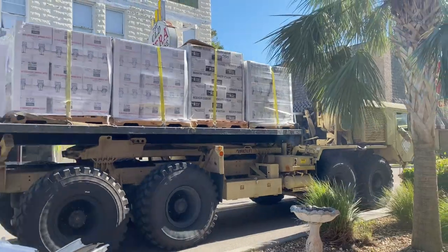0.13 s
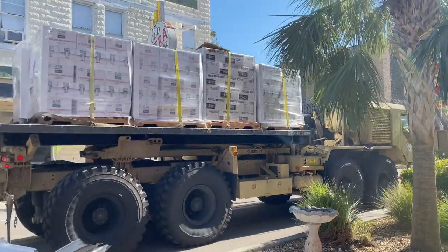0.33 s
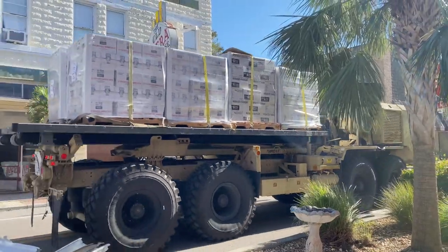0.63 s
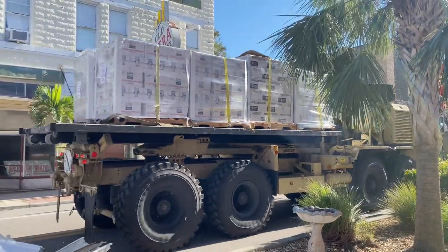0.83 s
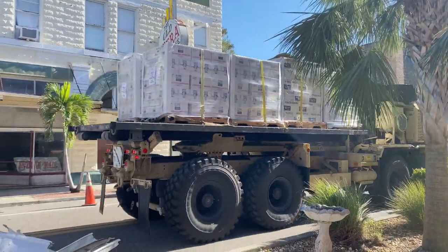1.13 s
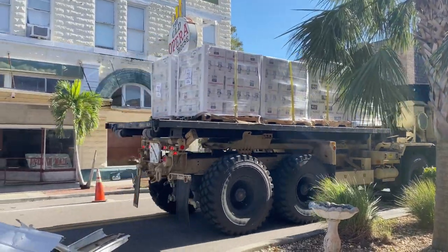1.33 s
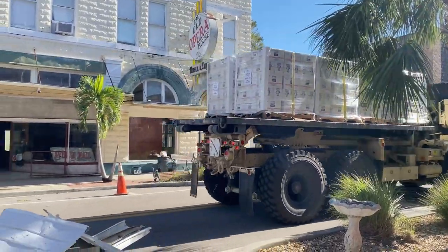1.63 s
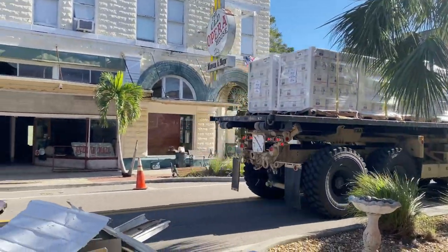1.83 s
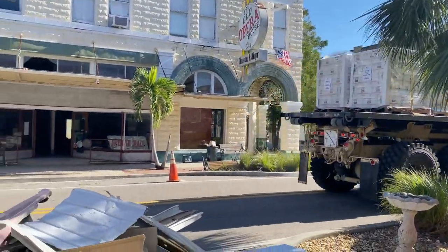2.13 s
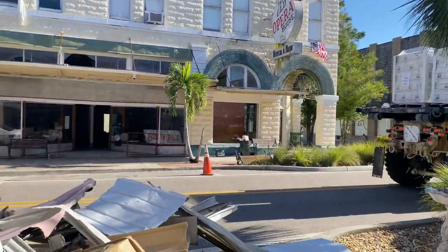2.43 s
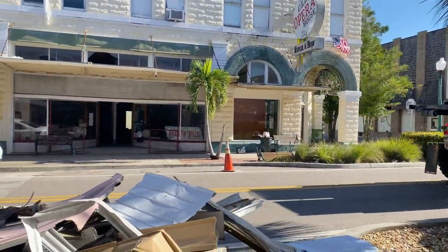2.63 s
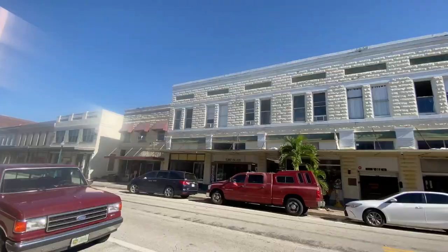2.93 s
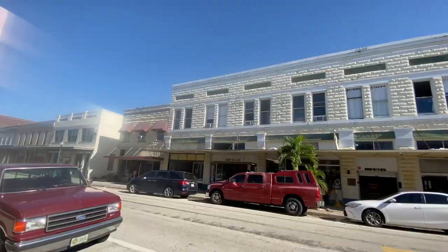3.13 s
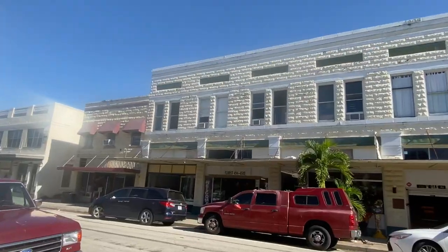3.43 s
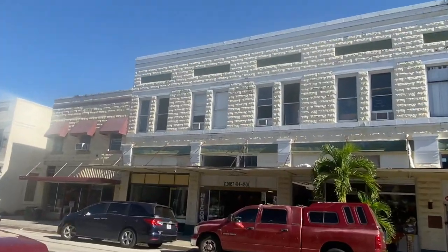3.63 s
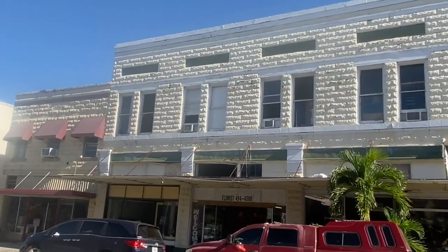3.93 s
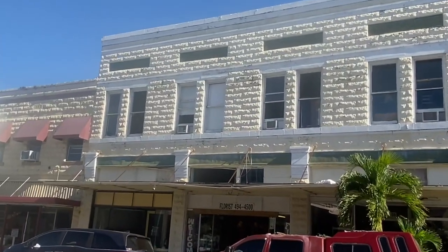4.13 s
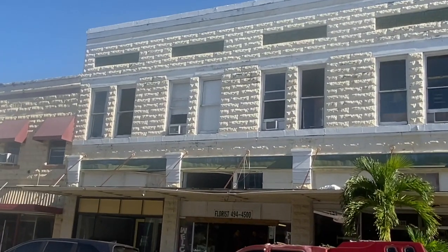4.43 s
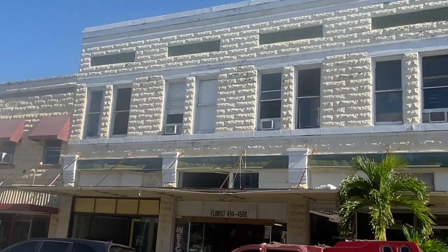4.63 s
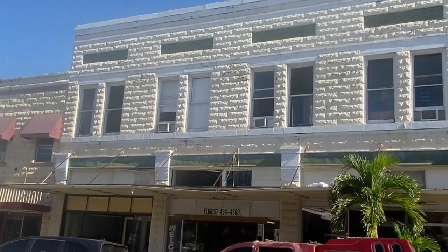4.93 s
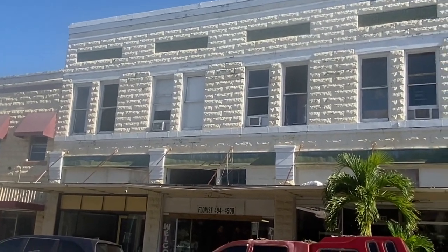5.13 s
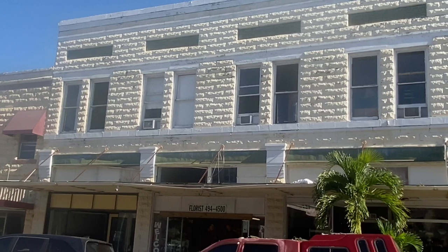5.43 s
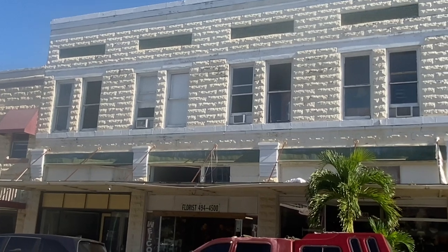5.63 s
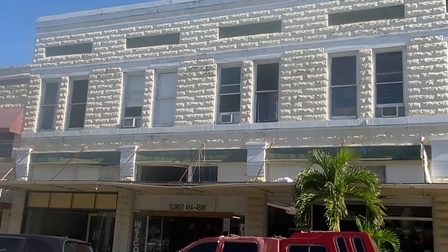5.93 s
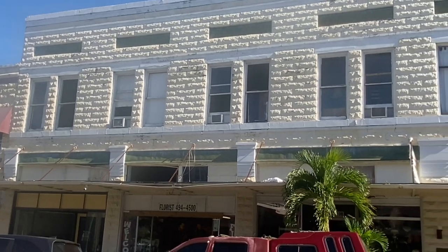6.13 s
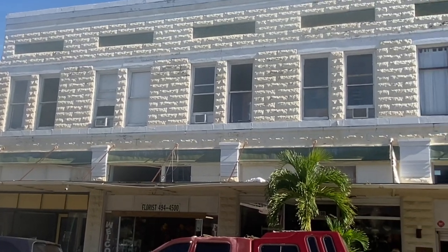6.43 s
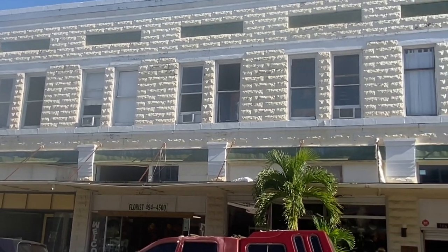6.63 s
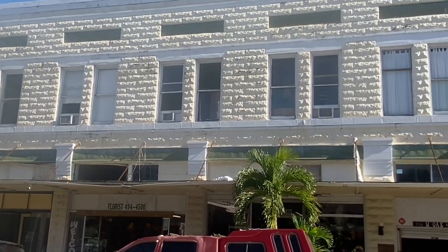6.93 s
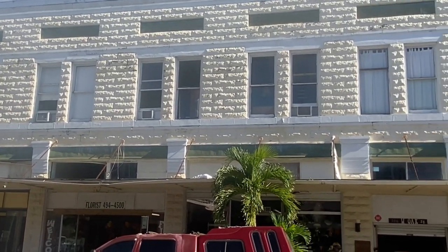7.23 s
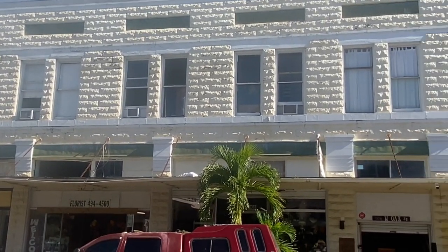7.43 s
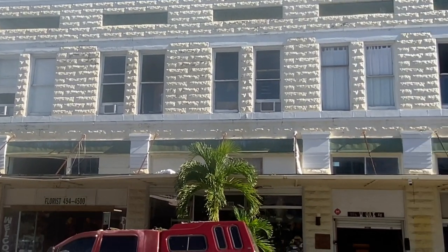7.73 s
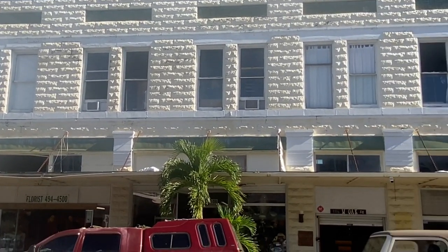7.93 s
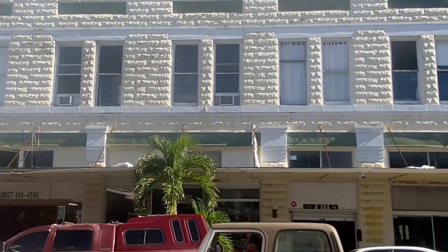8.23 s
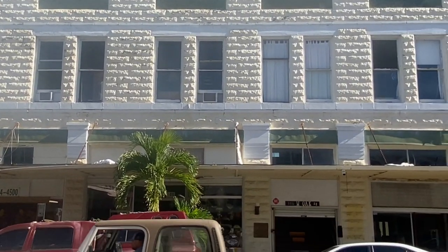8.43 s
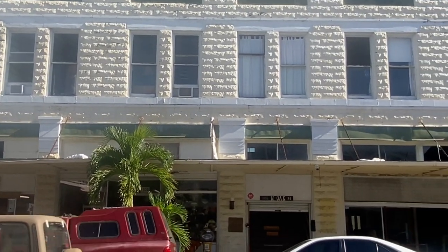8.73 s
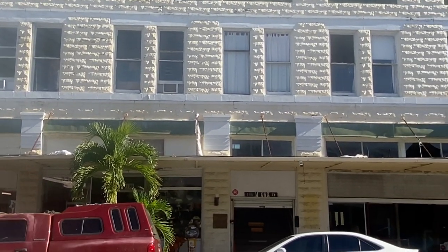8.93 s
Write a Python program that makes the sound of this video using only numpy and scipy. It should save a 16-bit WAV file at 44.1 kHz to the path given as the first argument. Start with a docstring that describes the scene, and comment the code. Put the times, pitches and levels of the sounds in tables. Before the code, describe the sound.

A big truck revs and whines past, giving way abruptly to a quieter street with buzzing cicadas and wind bumping the microphone.

```python
"""A heavy diesel truck pulls away close by along a shop street: a climbing firing drone, gear whine,
exhaust and tyre roar, turbo whistles and a puff of air from a valve.
A hard cut drops to the same street, now quiet. Cicadas throb in the trees, their clicks blurring to a
buzz in resonant abdomens; light wind bumps the microphone, distant engines hum and a car rolls
slowly past."""
import sys
import numpy as np
from scipy import signal
from scipy.fft import rfft, irfft
from scipy.io import wavfile
from scipy.ndimage import uniform_filter1d

SR = 44100
rng = np.random.default_rng(int(sys.argv[2]) if len(sys.argv) > 2 else 0)


def output_pcm(signal):
    """Save a mono or channel-first signal as 16-bit PCM at the path in sys.argv[1].

    Samples are clipped to [-1, 1] before scaling.
    """
    pcm = np.clip(np.atleast_2d(signal).T, -1, 1) * 32767
    wavfile.write(sys.argv[1], SR, np.round(pcm).astype(np.int16))


N = 400428
T = np.arange(N) / SR
CUT_S = 2.923
SIZE, HOP = 1024, 256
HZ, FRAME_S = np.fft.rfftfreq(SIZE, 1 / SR), np.arange(N // HOP + 5) * HOP / SR

# The engine revving up: time_s, firing_hz
FIRING = [(0, 31), (.18, 40.7), (.51, 56.4), (.69, 59.3), (1.15, 67.4), (1.93, 76.6), (2.68, 88.2),
          (2.93, 90)]
# Stereo image of the near and far sounds: freq_hz, likeness (0-1), right_lead_turns
NEAR_IMAGE = [(60, 0.96, .01), (170, 0.89, .03), (340, .7, .11), (600, .5, .23), (1200, 0.28, 0.34),
              (1800, 0.3, 0.56), (2590, 0.4, 0.8), (3800, 0.13, 1.03), (7000, 0.12, 1.16),
              (9100, 0.45, 1.44), (10040, .6, 1.74), (11000, 1, 2), (11750, 1, 1.97), (12700, .95, 2.5),
              (13700, .95, 2.5), (14800, 1, 3)]
FAR_IMAGE = [(60, .85, 0), (170, .8, .02), (340, 0.7, 0.14), (600, 0.52, 0.21), (1190, 0.48, 0.5),
             (1770, 0.46, 0.92), (2470, 1, 1), (7550, .99, 1), (8560, 0.9, 1.55), (9050, 1, 1.5),
             (10000, 0.9, 1.73), (10900, 1, 2), (11700, 1, 2), (12700, .95, 2.5), (13700, 1, 2.5),
             (14900, 1, 3)]


def amp(db):
    """Decibels to gain."""
    return 10 ** (np.asarray(db) / 20)


def unit_rms(x):
    """Scales to rms 1."""
    return x / np.sqrt(np.mean(x ** 2) + 1e-20)


def at_hz(table, hz, column=1):
    """Reads a table on a log-frequency axis."""
    columns = np.transpose(table)
    return np.interp(np.log(hz + 1), np.log(columns[0] + 1), columns[column])


def curves(table):
    """Joins timed rows by straight lines, one curve per value column."""
    time_s, *columns = np.transpose(table)
    return [np.interp(T, time_s, column) for column in columns]


def wander(rate_hz):
    """Smooth random drift of rms 1, rolling off above rate_hz."""
    step = 32
    size = N // step + 2
    rolloff = np.exp(-(np.fft.rfftfreq(size, step / SR) / rate_hz) ** 2)
    drift = irfft(rfft(rng.standard_normal(size)) * rolloff, size)
    return np.interp(np.arange(N) / step, np.arange(size), unit_rms(drift))


def noise(colour_db, image, patchy_db=1.5, patch_size=(10, 10)):
    """Coloured stereo noise of rms 1, mottled in level by patches of (bins, frames)."""
    a, b, c, d, patches = rng.standard_normal((len(FRAME_S), len(HZ), 5), dtype=np.float32).T
    for axis, size in enumerate(patch_size):
        patches = uniform_filter1d(patches, size=size, axis=axis)
    # the mid treble opens wide just after the cut, then gathers in the centre
    wide = np.outer((HZ > 1500) & (HZ < 8700), (FRAME_S > CUT_S) & (FRAME_S < 4.25))
    likeness = np.clip(at_hz(image, HZ)[:, None] * np.where(wide, .12, 1), 0, 1)
    delay = np.exp(-2j * np.pi * at_hz(image, HZ, column=2))[:, None]
    right = a + 1j * b
    left = likeness * delay * right + np.sqrt(1 - likeness ** 2) * (c + 1j * d)
    gain = amp(np.reshape(colour_db, (len(HZ), -1)) + patchy_db * unit_rms(patches))
    _, stereo = signal.istft(gain * np.array([left, right]), nperseg=SIZE, noverlap=SIZE - HOP)
    return unit_rms(stereo[:, :N])


def tone(hz, rms_db, waver_db=0., blur_hz=0.):
    """A sine following pitch and level curves, with optional slow waver and fast pitch jitter."""
    turns = np.cumsum(hz + blur_hz * wander(143)) / SR + rng.random()
    return np.sqrt(2) * amp(rms_db + waver_db * wander(3.6)) * np.sin(2 * np.pi * turns)


def glide(start_s, length_s, from_hz, to_hz, crest_db, **texture):
    """A sliding tone that swells to its midpoint and falls away."""
    progress = np.clip((T - start_s) / length_s, 0, 1)
    fade = np.clip(np.minimum(progress, 1 - progress) * length_s / .021, 0, 1)
    level_db = crest_db - 9.5 * (2 * progress - 1) ** 2
    return fade * tone(from_hz + (to_hz - from_hz) * progress, level_db, **texture)


def placed(x, left_db=0., lag_s=.0003):
    """Sets a mono source off to the right: the left microphone hears it later."""
    return np.array([amp(left_db / 2) * np.roll(x, round(lag_s * SR)), amp(-left_db / 2) * x])


def engine_drone():
    """Firing tones sweep through the pipe's resonances; six uneven cylinders add sixths between them."""
    # Strong partials: multiple of the firing rate; level_db at full throttle, ahead of the pipe
    multiples = np.array([2, 3, 4, 6, 8]) / 2
    levels_db = [-19.5, -32.5, -28, -38, -42.5]
    # Resonances of exhaust pipe and street together: freq_hz, gain_db
    pipe = [(40, 3), (59.5, 6.5), (65, -2), (70, 2.5), (74, -3), (77, 3.5), (82, -4.5), (86, -0.5),
            (91, -13), (104, 7.5), (113, -8), (130, 2.5), (142, 0.5), (147, -8), (154, 0), (165, -10),
            (176, -5.5), (250, 1.5), (350, 0)]
    firing_hz, = curves(FIRING)
    coasting_db, throttle_s, rise_s = -16, .59, .044  # weak until the driver steps on it
    load_db = coasting_db / (1 + np.exp((T - throttle_s) / rise_s))
    drone = sum(tone(k * firing_hz, db + load_db + at_hz(pipe, k * firing_hz))
                for k, db in zip(multiples, levels_db))
    sixths = [k / 6 for k in range(5, 40) if k / 6 not in multiples]
    drone += sum(tone(k * firing_hz, -45.5 - 3.3 * k, waver_db=7) for k in sixths)
    return placed(drone, left_db=1.2, lag_s=.00045)


def gear_whine():
    """Gear teeth sing with the revs, loudest as the gearbox goes by, among brief drivetrain moans."""
    # Drivetrain tones: start_s, length_s, from_hz, to_hz, crest_db
    moan_glides = [(.2, .45, 466, 470, -32), (.85, .25, 473, 474, -33), (2.08, .47, 378, 411, -28.5),
                   (2.5, .4, 266, 288, -31.5), (2.65, .35, 207, 224, -31.5), (.2, .35, 1380, 1450, -37),
                   (.53, .13, 1880, 1780, -36), (.7, .24, 1880, 1800, -38), (1.04, .14, 1760, 1790, -35),
                   (1.2, .19, 1830, 1840, -32)]
    firing_hz, = curves(FIRING)
    teeth_per_firing, loudest_s = 32.3, 1.5
    gear_db = -37.5 - 4 * (T - loudest_s) ** 2
    gear = tone(teeth_per_firing * firing_hz, gear_db, waver_db=2.5, blur_hz=38)
    moans = sum(glide(*row, waver_db=1, blur_hz=4 + .006 * row[2]) for row in moan_glides)
    return placed(gear + moans, left_db=-3, lag_s=.0001)


def truck_roar():
    """Exhaust and tyre roar and a bright hiss pulse with each firing, over the ringing chassis."""
    # Spectra of the roar and the hiss: freq_hz, level_db
    roar_colour = [(15, -52), (25, -40), (58, -22.5), (86, -5), (198, -13.5), (287, -14), (338, -15),
                   (425, -9), (556, -12), (913, -12), (1960, -15.5), (2360, -18.5), (3500, -32.5),
                   (4550, -48), (7700, -120)]
    hiss_colour = [(1650, -28), (2800, -4), (5040, -8), (6250, -9), (9400, -9.5), (11900, -16), (12500, -8),
                   (13300, -21), (14600, -20), (15500, -36)]
    # Chassis resonances: pitch_hz, width_hz, level_db
    chassis_modes = [(280.3, 25, -37.5), (698, 48.4, -32.5), (977, 58.5, -35), (1800, 56, -39.5)]
    firing_hz, = curves(FIRING)
    gap = np.exp(-T / .32)  # closes as the truck draws alongside
    pulse = 1 + .07 * np.cos(2 * np.pi * np.cumsum(firing_hz) / SR)
    roar = noise(at_hz(roar_colour, HZ), NEAR_IMAGE, patchy_db=2.5, patch_size=(2, 18))  # narrow streaks
    chassis = sum(tone(hz, db, waver_db=.5, blur_hz=width) for hz, width, db in chassis_modes)
    hiss = noise(at_hz(hiss_colour, HZ), NEAR_IMAGE, patchy_db=.87)
    return pulse * (amp(-19.5 - 3 * gap) * roar + amp(-31 - 8 * gap) * hiss) + placed(chassis)


def turbo():
    """Short breathy air whistles and one faint, wide, rising turbo sweep."""
    # Air whistles: start_s, length_s, from_hz, to_hz, crest_db
    whistle_glides = [(.7, .22, 7900, 8150, -45), (2.57, .5, 7100, 8600, -39.5),
                      (2.53, .32, 8470, 8700, -41)]
    # Turbo sweep: start_s, length_s, from_hz, to_hz, crest_db
    sweep_glide = (1.05, .85, 9650, 12900, -45)
    whistles = sum(glide(*row, waver_db=2, blur_hz=105) for row in whistle_glides)
    sweep = np.array([glide(*sweep_glide, waver_db=2, blur_hz=200) for side in range(2)])
    return placed(whistles, lag_s=.000025) + sweep


def valve_puff():
    """An air valve spits one short, bright puff."""
    # Spectrum of the escaping air: freq_hz, level_db
    colour = [(6000, -20), (9500, -6), (10500, 1.5), (12000, -9), (15000, -6), (15700, -9)]
    start_s, open_s, attack_s, decay_s = .705, .029, .006, .015
    attack = np.clip((T - start_s) / attack_s, 0, 1)
    decay = np.exp(-np.maximum(T - start_s - open_s, 0) / decay_s)
    return amp(-30) * attack * decay * noise(at_hz(colour, HZ), NEAR_IMAGE)


def cicadas():
    """Dense clicks blur to noise in the abdomen resonance; the song throbs, sagging at each swell."""
    # Swell of the chorus: time_s, chorus_db, overtone_trim_db
    dynamics = [(2.92, -32, -2), (3.4, -32.5, -5), (4.2, -34.5, -1), (5.2, -33, -1.5), (6.2, -29, 0),
                (6.8, -24.5, 0.5), (7.15, -23, -3), (7.4, -25.5, -1), (7.6, -23.5, -3.5), (8, -25.5, -1),
                (8.4, -25, 1.5), (8.8, -27.5, 3), (9.08, -28, 0.5)]
    # Spectra of the abdomen resonance and its overtones: freq_hz, level_db
    song_colour = [(2410, -44), (4100, -26.5), (4530, -11.5), (4810, -3.5), (5060, 0.5), (5280, -6),
                   (6540, -34), (8100, -40), (8800, -59), (11400, -85), (19400, -120)]
    overtone_colour = [(5180, -62), (8800, -16), (9590, -2.5), (10000, 4.5), (10600, -4.5), (12400, -19),
                       (12800, -12), (13200, -36), (13500, -23), (14200, -13), (15500, -17.5)]
    colour_centre_hz, throb_hz = 4954, 19.5
    chorus_db, overtone_trim_db = curves(dynamics)
    ring_hz = 5091 - 55 * np.maximum(T - 6.4, 0)  # sinks late in the song
    swell = np.cos(2 * np.pi * (throb_hz * T + .12 + .12 * wander(7.5)))
    depth_db = 1.4 + .22 * (chorus_db + 32)  # deeper as the nearest singer grows louder
    throb = amp(depth_db * swell + .7 * wander(6))
    sag = 1 - .004 * (swell + .8 * wander(12))
    shift = np.interp(FRAME_S, T, ring_hz / colour_centre_hz * sag)
    chorus = throb * noise(at_hz(song_colour, HZ[:, None] / shift), FAR_IMAGE, patchy_db=1.75)
    # two near singers ring narrowly, each drifting about the resonance
    near_pair = sum(tone(ring_hz * (1 + .015 * wander(8) - .004 * swell), 0, blur_hz=70)
                    for singer in range(2))
    song = unit_rms(unit_rms(chorus) + amp(-4) * throb * near_pair)
    overtones = unit_rms(throb * noise(at_hz(overtone_colour, HZ), FAR_IMAGE))
    return amp(chorus_db) * (song + amp(-20.5 + overtone_trim_db) * overtones)


def wind():
    """Light wind on the microphone: a lumpy rumble with single soft bumps."""
    # Gusts: time_s, level_db
    gusts = [(2.93, -38), (3.45, -36), (3.8, -32), (4.02, -35), (4.3, -31), (4.65, -42), (5.2, -38),
             (5.95, -31.5), (6.5, -34), (7, -31), (7.3, -35), (7.6, -31), (8.7, -30), (9.08, -34)]
    # Spectrum of the rumble: freq_hz, level_db
    colour = [(12, -54), (20, -24), (40, -5.5), (65, 0), (125, -7), (160, -11), (184, -12.5), (315, -25),
              (400, -26.5), (520, -35), (880, -120)]
    # Buffets on the microphone: time_s, peak_db, pitch_hz
    buffets = [(3.719, -22, 72), (3.779, -22, 63), (3.84, -17, 69), (3.918, -14.5, 110), (3.949, -23, 113),
               (4.028, -21.5, 131.3), (4.089, -21, 70.6), (4.2, -18, 81), (4.249, -20, 86.1),
               (4.449, -29, 129), (4.527, -26, 247), (5.968, -17.5, 110), (6.089, -22, 79)]
    gust_db, = curves(gusts)
    rumble = amp(gust_db + 2.33 * wander(11.7)) * noise(at_hz(colour, HZ), FAR_IMAGE)
    bumps = np.zeros(N)
    for time_s, peak_db, hz in buffets:
        age_s = T - time_s
        envelope = np.exp(-((age_s - .008) * hz / .88) ** 2)
        bumps += amp(peak_db) * envelope * np.sin(2 * np.pi * hz * age_s)
    return rumble + placed(bumps)


def distant_town():
    """A soft bed of town noise, with far-off engines humming in and out."""
    # Spectrum of the town wash: freq_hz, level_db
    colour = [(88, -27), (150, 3.5), (370, 0), (415, -10), (577, -2), (628, -7), (849, -4), (3410, -17.5),
              (4600, -45), (5980, -52), (10100, -120)]
    # Distant engine tones: start_s, length_s, from_hz, to_hz, crest_db
    hum_glides = [(2.85, 1.03, 140.2, 151.7, -34), (3.047, 0.56, 286, 296, -47),
                  (4.134, .3, 158, 152, -31.5), (5.25, 0.99, 60, 57, -32.5), (7.8, 1.2, 58.6, 58.1, -36),
                  (5.65, .7, 119.3, 117.8, -34), (6.698, 0.54, 117, 115.8, -38),
                  (7.45, 0.55, 116.5, 117, -34.5), (8.1, 0.71, 120.3, 120.9, -33.5),
                  (6.5, 2.95, 174.4, 170, -38), (7.25, 2.2, 154.2, 153.2, -38.5),
                  (7.601, 2, 256.7, 288.8, -40)]
    wash = amp(-46.5) * noise(at_hz(colour, HZ), FAR_IMAGE, patchy_db=1.4)
    hums = sum(glide(*row, waver_db=1, blur_hz=4) for row in hum_glides)
    return wash + placed(hums)


def passing_car():
    """A slow car's rolling noise swells and fades with its distance."""
    # Spectrum of the rolling car: freq_hz, level_db
    colour = [(88, -81), (150, -4), (231, -26.5), (262, -3), (303, -6), (813, -6.5), (1380, -14),
              (3660, -27), (4600, -65.5), (5980, -75), (10100, -120)]
    closest_s, closest_m, speed_m_per_s, loss_db_per_m = 8.12, 6., 7.96, .17
    distance_m = np.hypot(closest_m, speed_m_per_s * (T - closest_s))
    gain = closest_m / distance_m * amp(-34 - loss_db_per_m * (distance_m - closest_m))
    return gain * noise(at_hz(colour, HZ), FAR_IMAGE)


def scene():
    """The truck up to the cut, the quiet street after it."""
    truck = engine_drone() + gear_whine() + truck_roar() + turbo() + valve_puff()
    street = cicadas() + wind() + distant_town() + passing_car()
    cut = np.clip((T - CUT_S) / .002, 0, 1)
    return (1 - cut) * truck + cut * street


def record(dry):
    """The microphone drops the deepest bass and the recorder shaves off the top treble."""
    low_cut = signal.butter(3, 40, "high", fs=SR, output="sos")
    high_cut = signal.firwin(1023, 15600, window=("kaiser", 9), fs=SR)
    return signal.oaconvolve(signal.sosfilt(low_cut, dry), high_cut[None], "same")


dry = scene()
out = record(dry)
output_pcm(out)
```